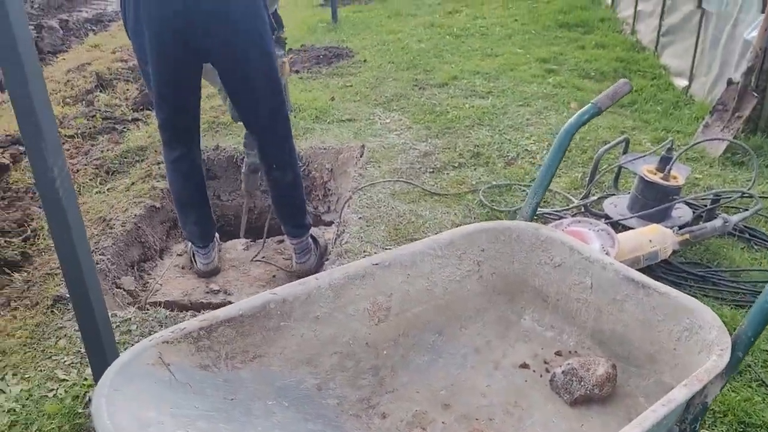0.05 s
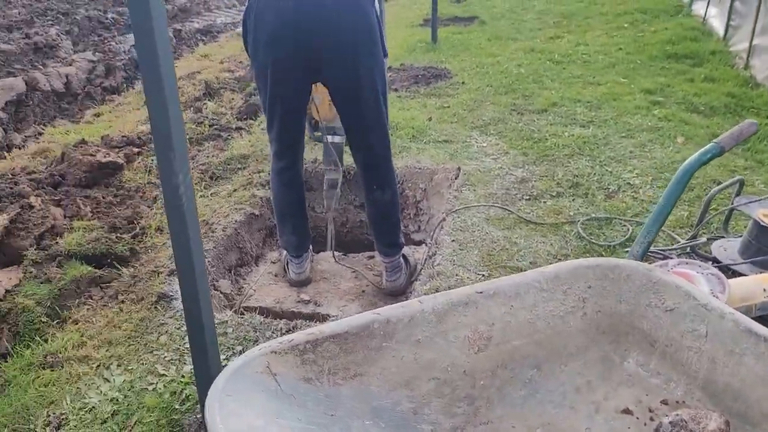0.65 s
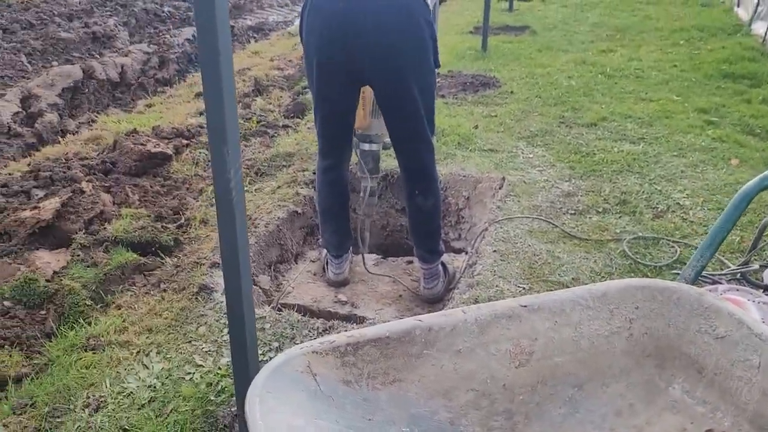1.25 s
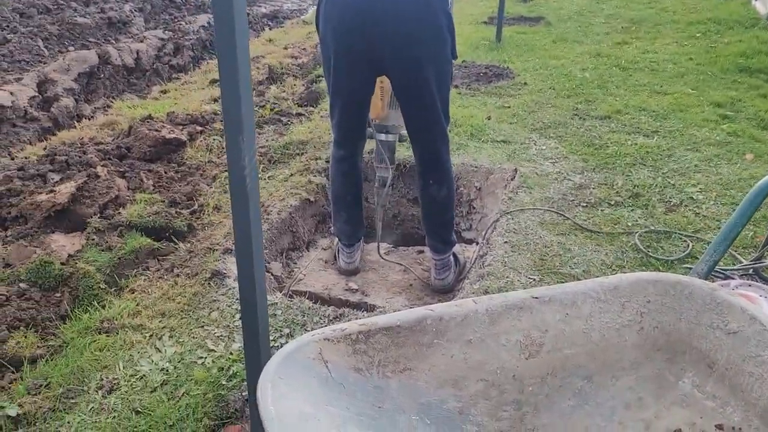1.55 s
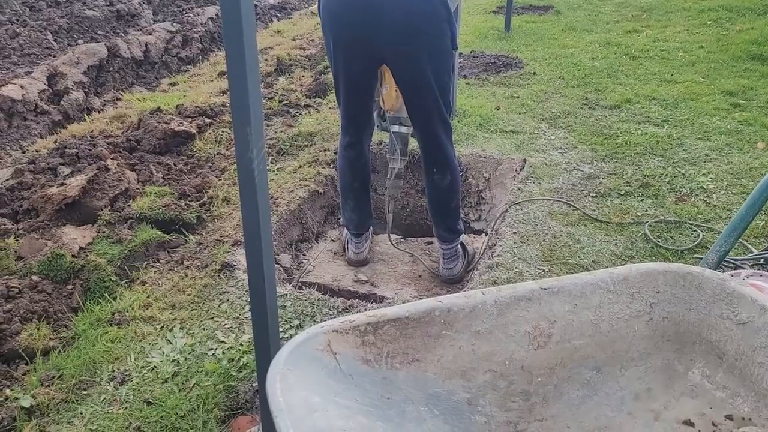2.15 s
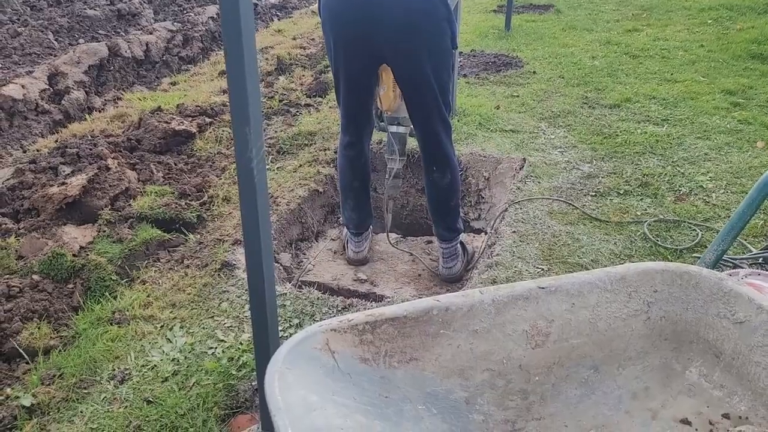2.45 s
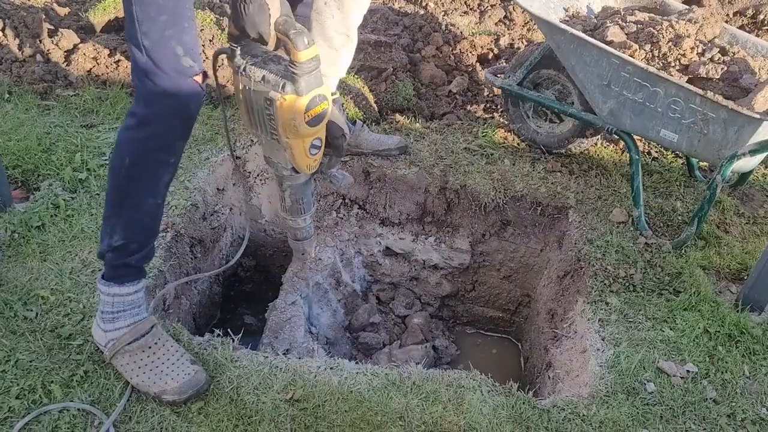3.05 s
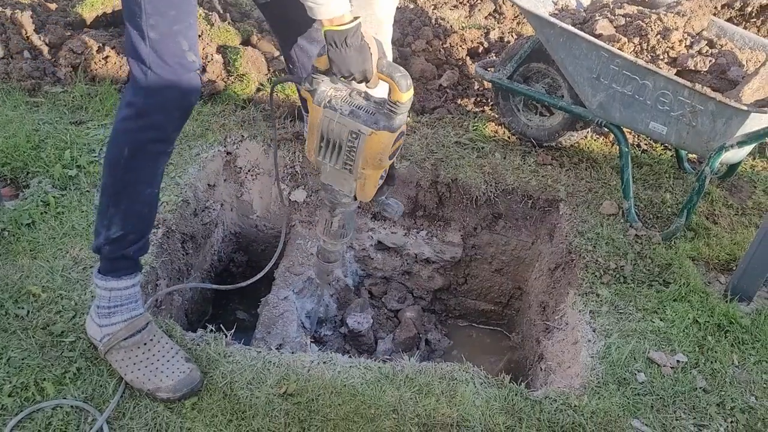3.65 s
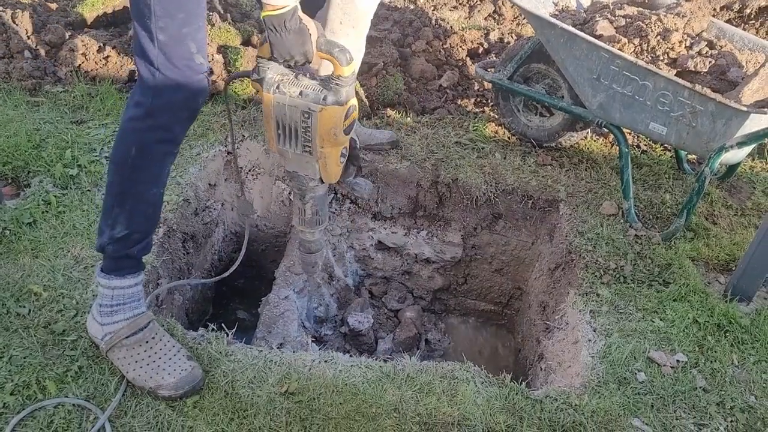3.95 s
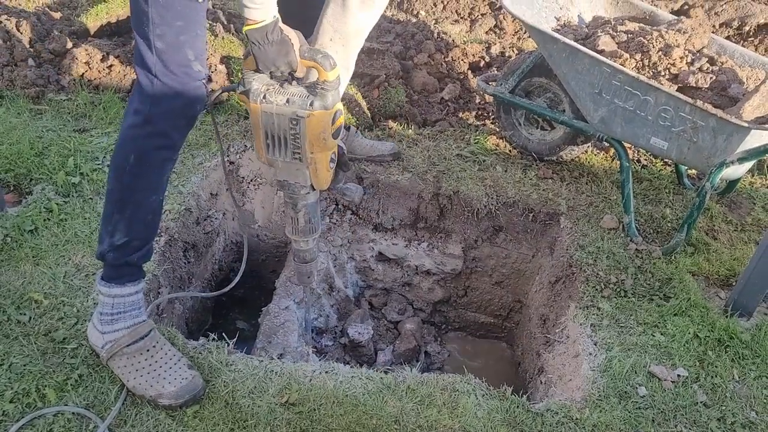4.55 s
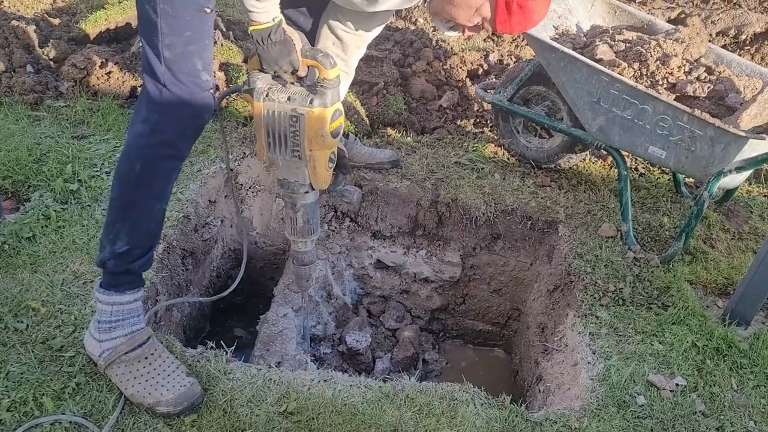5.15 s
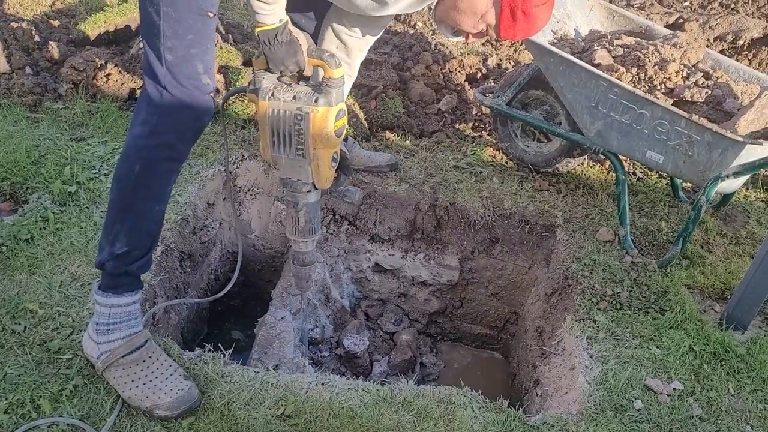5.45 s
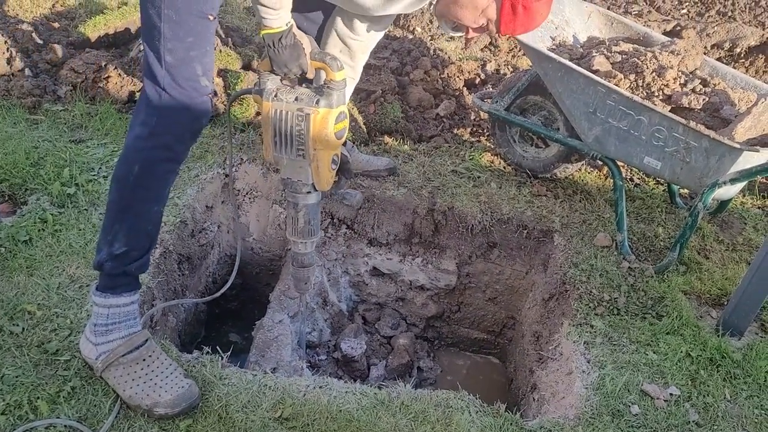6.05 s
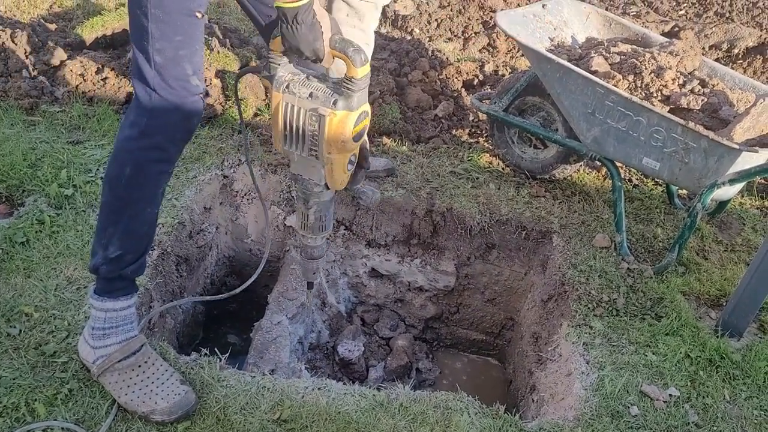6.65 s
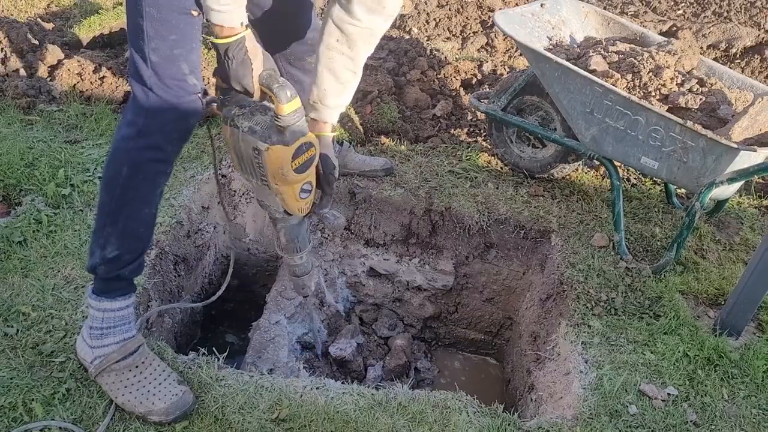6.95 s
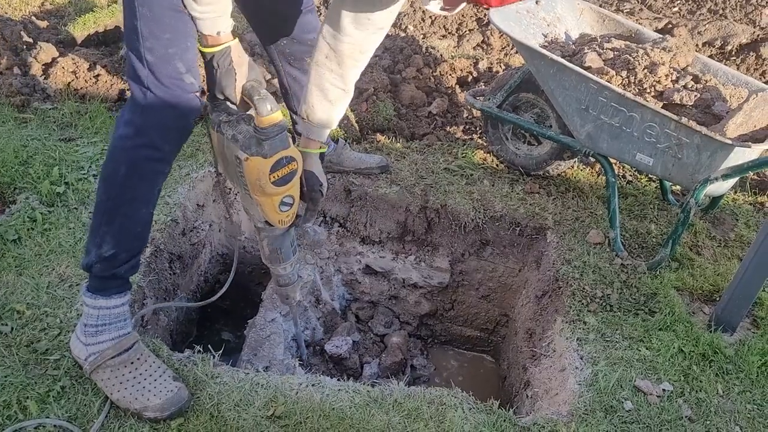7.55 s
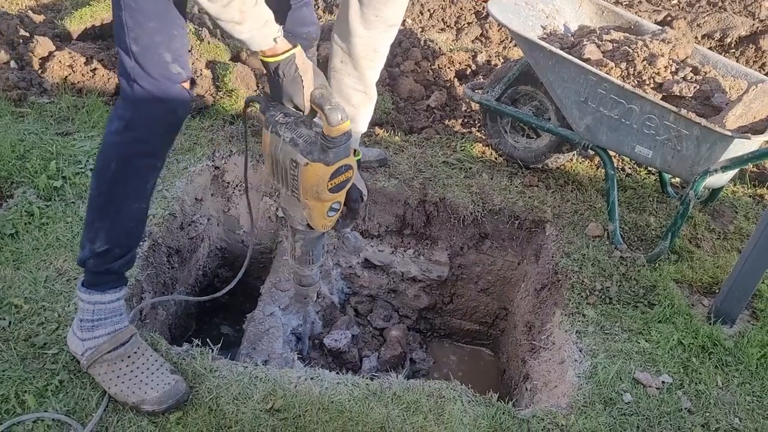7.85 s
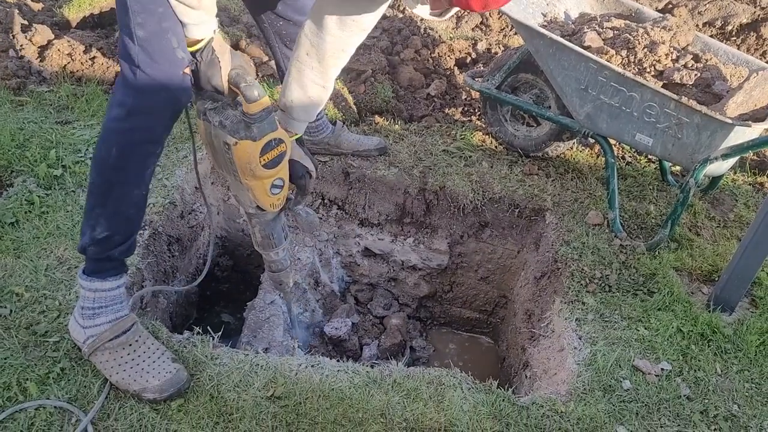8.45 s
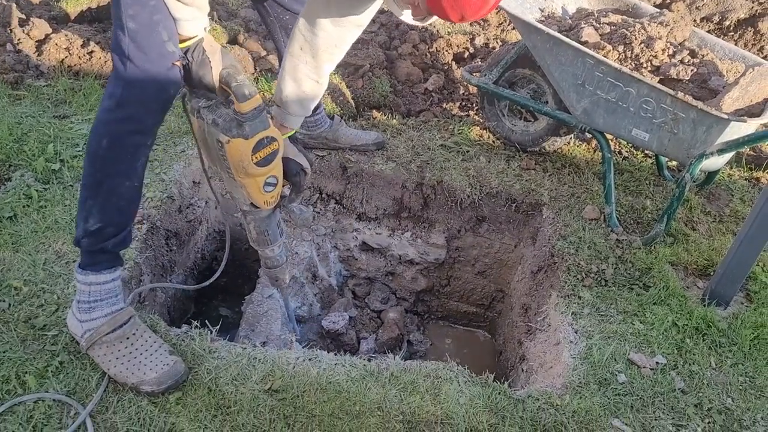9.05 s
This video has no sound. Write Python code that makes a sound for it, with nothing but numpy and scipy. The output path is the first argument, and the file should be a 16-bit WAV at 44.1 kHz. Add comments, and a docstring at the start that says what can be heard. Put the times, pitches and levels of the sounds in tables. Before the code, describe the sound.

Fast, rattling blows of an electric jackhammer break concrete outdoors, first farther off, then close, its motor running on through short pauses.

```python
"""Garden pit: an electric demolition hammer chisels concrete, heard from behind the worker, then,
after a short silence, from the pit's edge. The striker hits about 32 times a second: stone cracks,
the steel rings as its tip seats, the ground thuds, a loose slab booms. Lifted clear, the chisel
rings on. Motor and fan keep running between bursts; wind buffets the microphone."""
import sys
import numpy as np
from scipy import signal
from scipy.fft import rfft, irfft, next_fast_len
from scipy.io import wavfile
from scipy.ndimage import uniform_filter1d

SR = 44100
rng = np.random.default_rng(int(sys.argv[2]) if len(sys.argv) > 2 else 0)


def digitize_waveform(pressure):
    """Quantize a signal to 16-bit integers and store it at the path in sys.argv[1].

    Rows of a 2-D input are taken as channels; values are limited to [-1, 1].
    """
    field = np.atleast_2d(pressure).T
    bounded = np.clip(field, -1, 1)
    quanta = np.round(bounded * 32767).astype(np.int16)
    wavfile.write(sys.argv[1], SR, quanta)


N = 410571
TIME_S = np.arange(N) / SR
BLOW_AGE_S = np.arange(2048) / SR

# silence between the two listening positions (start [s], end [s])
GAP_S = (2.694, 2.742)
# motor speed (time [s], blow rate [Hz])
BLOW_RATE_HZ = [(0, 33.4), (0.3, 32.39), (0.64, 32.39), (1.16, 31.41), (1.41, 32.21), (1.67, 31.83),
                (2.46, 32.29), (3.2, 32.14), (3.67, 33.21), (4.24, 31.94), (5.19, 32.17), (7.51, 32.3),
                (7.79, 32.72), (8.22, 31.67), (9.09, 31.92), (9.3, 32.24)]
# fan and gear noise as the tool is turned and hidden by the worker (time [s], level [dB])
MOTOR_DB = [(0, -30), (0.75, -32.5), (1.4, -39.5), (2.69, -35), (2.75, -26.5), (3.6, -30), (4.3, -27),
            (6.4, -27.5), (7.4, -28.5), (7.9, -22.5), (8.35, -28)]
# armature tone (time [s], level [dB])
WHINE_DB = [(0, -34), (0.55, -34.5), (0.9, -43), (2.7, -47), (4.4, -54), (4.8, -42), (6.35, -39),
            (6.5, -57)]
# rumbling gusts; short, sharper buffets (peak time [s], half length [s], level [dB])
WIND_GUSTS = [(0.08, 0.1, -35), (0.9, 0.16, -40), (2.1, 0.17, -43.5), (2.77, 0.056, -28), (3.37, 0.19, -26),
              (5.85, 0.23, -30), (6.18, 0.21, -31.5), (7.95, 0.14, -31), (8.5, 0.22, -32)]
WIND_BUFFETS = [(0.07, 0.076, -31.5), (1.78, 0.041, -32), (1.87, 0.015, -34), (2.18, 0.052, -30),
                (2.35, 0.013, -33.5)]
# chisel pressed down (start [s], end [s], force [dB], initial softness [dB], easing [dB/s])
CHISEL_BURSTS = [(0.3129, 2.69, -21.7, 0.5, 2.7), (2.7405, 3.19, -19, 0, 3), (3.357, 3.465, -22.5, 0, -14),
                 (3.5057, 6.37, -19, 12, -0.1), (7.47, 9.31, -19, 3.5, 1.4)]
# tip seats that let steel or slab ring (start [s], end [s], seat name, level against the blow [dB])
TIP_SEATS = [(0.59, 1.09, "free", 1), (0.573, 1.148, "wedged", -7), (1.173, 1.912, "wedged", 1.5),
             (1.808, 2.714, "free", -3.5), (2.65, 2.97, "slab", -3.5), (2.98, 3.176, "slab", -9.5),
             (2.72, 4.328, "free", -9.5), (2.72, 3.5, "leaning", -29), (3.586, 4.318, "leaning", -3.5),
             (5.246, 6.4, "pressed", -9), (7.81, 8.783, "leaning", -3), (7.9, 8.78, "free", -7),
             (8.778, 9.4, "free", -1), (8.765, 9.4, "slab", -5.5)]
# noise spectra (frequency [Hz], relative density [dB])
FAN_SPECTRUM = [(60, -25), (170, -33), (260, 3.5), (420, -10), (600, 0), (1100, -1), (1550, 6), (2400, 1),
                (3400, 5), (5400, -3), (6500, -4), (7200, 1), (9000, -16.5), (11000, -9.5), (15500, -25)]
RUMBLE_SPECTRUM = [(15, -36), (35, -15), (58, -3), (100, -9), (200, -17.5), (500, -28.5), (1500, -70)]
FLUTTER_SPECTRUM = [(60, -2), (150, 2), (300, 8), (480, -2.5), (800, -10), (2000, -60)]
FAR_CRACK_SPECTRUM = [(100, -37), (400, -4), (900, -3.5), (1800, -4), (3000, -1), (4600, 5.5), (7200, 5.5),
                      (9000, -2), (11000, 1), (13000, -2), (16000, -2.5)]
NEAR_CRACK_SPECTRUM = [(40, -36), (120, -20), (400, -17), (800, -9.5), (1200, -1.5), (1700, 4), (3200, -1),
                       (5500, 4), (7200, 5.5), (8200, 3), (9000, -5.5), (12000, -0.5), (15500, -0.5)]
KNOCK_SPECTRUM = [(60, -36), (200, -1.5), (550, -6.5), (1000, -1.5), (1600, 0), (3200, 5.5), (4500, -1),
                  (8000, -11)]
# left-right likeness of airborne sound (frequency [Hz], correlation [0..1])
COHERENCE = [(100, 0.83), (600, 1), (1400, 0.74), (3000, 0.7), (7000, 0.27), (15000, 0.55)]
# chisel modes: free, wedged in a crack, leaning on stone, pressed hard
# (frequency [Hz], relative level [dB], undamped T60 [s])
FREE_MODES = [(3780, -17, .05), (7085, 0, .07), (13890, -3, .075), (15190, -11, .05)]
WEDGED_MODES = [(3050, -11, .03), (4490, 0.5, .06), (5150, -8, .04), (6170, -3, .06), (8130, -7, .05),
                (10500, -6, .05), (12050, -8, .05), (13210, 0, .065), (15080, -6, .05)]
LEANING_MODES = [(4630, -8.5, 0.071), (6860, 2.5, 0.099), (9320, 1, 0.028), (12400, -2, 0.044),
                 (13600, 3.5, 0.084)]
PRESSED_MODES = [(7480, -5.5, 0.058), (10790, 2, .04)]
# ground and slab modes (frequency [Hz], relative level [dB], undamped T60 [s])
GROUND_MODES = [(151.5, -3, 0.055), (235, 0, 0.034), (271, 1, 0.039)]
LOOSE_SLAB_MODES = [(330, 1, .06), (440, -2, .04), (548, -2.5, .055), (778, 1, .045), (925, 0, .035),
                    (1055, 0.5, .05)]


def amp(db):
    """Decibels to gain."""
    return 10 ** (np.asarray(db) / 20)


def unit_rms(x):
    """Scale to rms 1."""
    return x / np.sqrt(np.mean(x ** 2) + 1e-20)


def curve(rows, times_s):
    """Interpolate a (time, value) table."""
    return np.interp(times_s, *np.transpose(rows))


def log_curve(rows, hz):
    """Interpolate a (frequency, value) table on a log axis."""
    knots_hz, values = np.transpose(rows)
    return np.interp(np.log(hz + 1), np.log(knots_hz), values)


def wobble(shape, width):
    """Noise of rms 1, averaged over `width` points."""
    return unit_rms(uniform_filter1d(rng.standard_normal(shape), size=width))


def coloured(white, spectrum, airborne=True, extra_db=0):
    """Shape a white noise pair; airborne sound is partly shared by the channels."""
    size = white.shape[-1]
    hz = np.fft.rfftfreq(size, 1 / SR)
    left, other = rfft(white)
    shared = log_curve(COHERENCE, hz) * airborne
    right = shared * left + np.sqrt(1 - shared ** 2) * other
    return unit_rms(irfft(np.array([left, right]) * amp(log_curve(spectrum, hz) + extra_db), size))


def noise(spectrum, airborne=True):
    """Steady stereo noise of rms 1."""
    return coloured(rng.standard_normal((2, next_fast_len(N))), spectrum, airborne)[:, :N]


def from_left(x):
    """At the pit's edge the right channel lags by 4 samples."""
    return np.array([x[0], np.where(TIME_S > GAP_S[0], np.roll(x[1], 4), x[1])])


def crank_turns():
    """Running count of crank turns."""
    return np.cumsum(curve(BLOW_RATE_HZ, TIME_S)) / SR


def motor(blows_s, throb=0.56, stroke_s=0.03):
    """Fan and gear noise, swelling as the piston compresses for the next blow."""
    since_s = TIME_S - blows_s[np.maximum(np.searchsorted(blows_s, TIME_S) - 1, 0)]
    swell = 1 + throb * np.exp(-((since_s - stroke_s) / 0.005) ** 2)
    rattle = 1 + 0.24 * wobble(N, 200)
    return noise(FAN_SPECTRUM) * swell * rattle * amp(curve(MOTOR_DB, TIME_S))


def whine(cycles_per_turn=44, roughness=0.61):
    """Armature tone, geared to the crank, roughened by uneven load."""
    flicker, jitter_rad = roughness * wobble((2, N), 500)
    phase_rad = 2 * np.pi * cycles_per_turn * crank_turns()
    return amp(curve(WHINE_DB, TIME_S)) * unit_rms((1 + flicker) * np.sin(phase_rad + jitter_rad))


def gust_gain(gusts, calm_db):
    """Bell-shaped gusts over a calm level."""
    power = sum(amp(db) ** 2 * np.exp(-2 * ((TIME_S - peak_s) / half_s) ** 2)
                for peak_s, half_s, db in gusts)
    return np.sqrt(amp(calm_db) ** 2 + power)


def wind(rumble_calm_db=-50, flutter_calm_db=-44.5):
    """Turbulence, uncorrelated left to right: lumpy rumble, plus flutter behind the worker."""
    behind = TIME_S < GAP_S[0]
    lumps = amp(2.2 * wobble((2, N), 2000))
    rumble = unit_rms(noise(RUMBLE_SPECTRUM, airborne=False) * lumps)
    rumble *= gust_gain(WIND_GUSTS, rumble_calm_db)
    eddies_db = 20 * np.log10(unit_rms(amp(3.5 * wobble(N, 2500))))
    flutter = noise(FLUTTER_SPECTRUM, airborne=False)
    flutter *= gust_gain(WIND_BUFFETS, flutter_calm_db + eddies_db)
    balance = np.where(behind, amp([[1.2], [-1.2]]), amp([[-2.5], [1.8]]))
    return rumble * balance + flutter * behind


def blow_times(jitter_s=0.00015):
    """One blow per crank turn while the chisel is pressed down."""
    turns = crank_turns()
    struck = np.concatenate([np.arange(*np.interp(row[:2], TIME_S, turns)) for row in CHISEL_BURSTS])
    return np.interp(struck, turns, TIME_S) + jitter_s * rng.standard_normal(len(struck))


def effort(blows_s, uneven_db, bite_s=0.51):
    """Force and time into the burst per blow: the tip bites, the worker eases off or leans in."""
    bursts = np.array(CHISEL_BURSTS)
    start_s, _, base_db, soft_db, ease_db_per_s = bursts[np.searchsorted(bursts[:, 1] + 0.02, blows_s)].T
    elapsed_s = blows_s - start_s
    force_db = base_db - soft_db * np.maximum(1 - elapsed_s / bite_s, 0) - ease_db_per_s * elapsed_s
    return force_db + uneven_db * rng.standard_normal(len(blows_s)), elapsed_s


def seat_db(blows_s, seat, idle_db, slide_s=0.044):
    """Ring level against the blow, raised while the tip sits in this seat."""
    power = amp(idle_db) ** 2
    for start_s, end_s, name, db in TIP_SEATS:
        if name == seat:
            inside = (np.tanh((blows_s - start_s) / slide_s) - np.tanh((blows_s - end_s) / slide_s)) / 2
            power = power + inside * amp(db) ** 2
    return 10 * np.log10(power)


def drift(shape, memory):
    """Unit random values (..., blow, k), correlated from blow to blow."""
    fresh = rng.standard_normal(shape)
    state = memory * rng.standard_normal(fresh[..., :1, :].shape)
    return signal.lfilter([np.sqrt(1 - memory ** 2)], [1, -memory], fresh, axis=-2, zi=state)[0]


def train(blows_s, rms_db, sounds):
    """Place sounds (channel, blow, sample) at the blow times."""
    size = len(BLOW_AGE_S)
    gain = amp(rms_db) * np.sqrt(SR / curve(BLOW_RATE_HZ, blows_s) / size)
    sounds = unit_rms(sounds) * gain[:, None]
    out = np.zeros((2, N + size))
    for blow, start in enumerate(np.round(blows_s * SR).astype(int)):
        out[:, start:start + size] += sounds[:, blow]
    return out[:, :N]


def crack(blows_s, spectrum, length_s, echo_db, echo_t60_s, rise_s, memory, patchy_db, bright_db=0):
    """Stone crushes under the tip: a short dense burst and a weak echo from the pit."""
    count, size = len(blows_s), len(BLOW_AGE_S)
    bins = size // 2 + 1
    colour_db = patchy_db * wobble((count, bins), 50) + np.outer(bright_db, np.linspace(0, 1, bins))
    grit = coloured(drift((2, count, size), memory), spectrum, extra_db=colour_db)
    lengths_s = length_s * amp(2.2 * rng.standard_normal((count, 1)))
    burst = np.exp(-(BLOW_AGE_S / lengths_s) ** 2) * np.sqrt(length_s / lengths_s)
    echo = amp(echo_db - 60 * BLOW_AGE_S / echo_t60_s)
    return grit * (burst + echo) * (1 - np.exp(-BLOW_AGE_S / rise_s)) ** 2


def ring(blows_s, modes, rise_s, vary_db, wander_rad, spread,
         delay_s=0, tilt_db_per_oct=0, detune_hz=0, chatter_rad=0):
    """Struck modes; strength and phase drift as the tip shifts, its chatter roughens them."""
    hz, mode_db, t60_s = np.transpose(modes)
    count = len(blows_s)
    shape = (count, len(hz))
    age_s = np.maximum(BLOW_AGE_S - delay_s, 0)
    damping_db = -600 * np.maximum(age_s - 0.012, 0)  # the returning tool damps the ring
    envelope = amp(damping_db - 60 * age_s / t60_s[:, None]) * (1 - np.exp(-age_s / rise_s))
    waves = np.exp(2j * np.pi * hz[:, None] * age_s) * envelope
    beam_level, beam_rad = spread * drift((2, 2) + shape, 0.6)  # each mode radiates its own way
    tilt_db = tilt_db_per_oct * np.log2(hz / hz[0])
    strength = amp(mode_db + tilt_db + vary_db * drift(shape, 0.29) + 2 * beam_level)
    phase_rad = wander_rad * drift(shape, 0.33) + beam_rad
    ringing = (strength * np.exp(1j * phase_rad)) @ waves
    pull_hz = detune_hz * rng.standard_normal((count, 1))  # contact stiffness pulls the pitch
    scrape_rad = chatter_rad * wobble((count, len(age_s)), 70)
    return (ringing * np.exp(1j * (2 * np.pi * pull_hz * age_s + scrape_rad))).imag


def far_hammer(blows_s):
    """Past the worker's legs: bright steel over cracking stone."""
    force_db, _ = effort(blows_s, uneven_db=1.2)
    stone = crack(blows_s, FAR_CRACK_SPECTRUM, length_s=0.0072, echo_db=-10.5, echo_t60_s=0.092,
                  rise_s=0.00042, memory=0.66, patchy_db=4)
    free = ring(blows_s, FREE_MODES, rise_s=0.0042, vary_db=2.5, wander_rad=1.0, spread=0.23,
                tilt_db_per_oct=9, detune_hz=22, chatter_rad=0.24)
    wedged = ring(blows_s, WEDGED_MODES, rise_s=0.00068, vary_db=3, wander_rad=1.5, spread=0.12,
                  detune_hz=35, chatter_rad=0.3)
    return (train(blows_s, force_db + 0.27, stone)
            + train(blows_s, force_db + seat_db(blows_s, "free", idle_db=-9), free)
            + train(blows_s, force_db + seat_db(blows_s, "wedged", idle_db=-14), wedged))


def near_steel(blows_s, force_db):
    """Chisel close by: one set of modes per seat."""
    seats = [("free", FREE_MODES, -11), ("leaning", LEANING_MODES, -8.5), ("pressed", PRESSED_MODES, -13)]
    out = np.zeros((2, N))
    for seat, modes, idle_db in seats:
        steel = ring(blows_s, modes, rise_s=0.0026, vary_db=3.5, wander_rad=0.96, spread=0.88,
                     tilt_db_per_oct=-1, detune_hz=45, chatter_rad=0.76)
        out += train(blows_s, force_db + seat_db(blows_s, seat, idle_db), steel)
    return out


def ground_and_slab(blows_s, force_db, elapsed_s, dig_db_per_s=2.5):
    """The ground thuds just after each blow, growing as the tip digs in; a loose slab booms."""
    thud = ring(blows_s, GROUND_MODES, rise_s=0.00095, vary_db=0.8, wander_rad=0.32, spread=0.068,
                delay_s=0.0034)
    slab = ring(blows_s, LOOSE_SLAB_MODES, rise_s=0.0018, vary_db=1.5, wander_rad=0.72, spread=0.24)
    thud_db = -19 + dig_db_per_s * elapsed_s
    slab_db = seat_db(blows_s, "slab", idle_db=thud_db - 2.5)
    return train(blows_s, force_db + thud_db, thud) + train(blows_s, force_db + slab_db, slab)


def near_hammer(blows_s):
    """At the pit's edge: a hard knock on concrete, cracking stone, steel, ground and slab."""
    force_db, elapsed_s = effort(blows_s, uneven_db=0.91)
    bright_db = 0.1 * (force_db - force_db.mean())  # harder blows are brighter
    stone = crack(blows_s, NEAR_CRACK_SPECTRUM, length_s=0.0092, echo_db=-5.5, echo_t60_s=0.11,
                  rise_s=0.00032, memory=0.64, patchy_db=2, bright_db=bright_db)
    knock = crack(blows_s, KNOCK_SPECTRUM, length_s=0.0024, echo_db=-9, echo_t60_s=0.047,
                  rise_s=0.00063, memory=0.83, patchy_db=2.5)
    concrete = train(blows_s, force_db - 0.3, stone) + train(blows_s, force_db - 7, knock)
    steel = near_steel(blows_s, force_db)
    return steel + from_left(concrete + ground_and_slab(blows_s, force_db, elapsed_s))


def lifted_chisel(lift_s=6.36, level_db=-22, t60_s=0.25):
    """Clear of the stone, the chisel's free modes die away slowly."""
    age_s = np.arange(SR // 4) / SR
    shake_rad = wobble((2, len(FREE_MODES), len(age_s)), 100)
    ringing = sum(amp(db) * np.sin(2 * np.pi * hz * age_s + shake_rad[:, k])
                  for k, (hz, db, _) in enumerate(FREE_MODES))
    out, start = np.zeros((2, N)), round(lift_s * SR)
    out[:, start:start + len(age_s)] = unit_rms(ringing) * amp(level_db - 60 * age_s / t60_s)
    return out


def scene():
    """Motor, hammer from both positions, wind."""
    blows_s = blow_times()
    drive = from_left(motor(blows_s)) + whine()
    hammer = far_hammer(blows_s[blows_s < GAP_S[0]]) + near_hammer(blows_s[blows_s > GAP_S[1 - 1]])
    return drive + hammer + lifted_chisel() + wind()


def record(dry, ceiling=1.1, cutoff_hz=16050):
    """Silent gap, soft overload, low-pass."""
    audible = (TIME_S < GAP_S[0]) | (TIME_S > GAP_S[1])
    clipped = ceiling * np.tanh(dry * audible / ceiling)
    lowpass = signal.firwin(401, cutoff_hz, window=("kaiser", 9), fs=SR)
    return signal.oaconvolve(clipped, lowpass[None], "same")


dry = scene()
out = record(dry)
digitize_waveform(out)
```